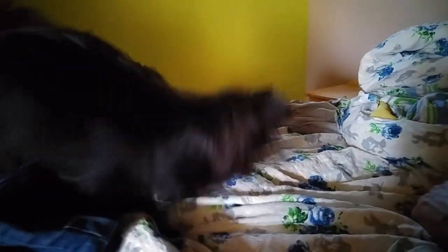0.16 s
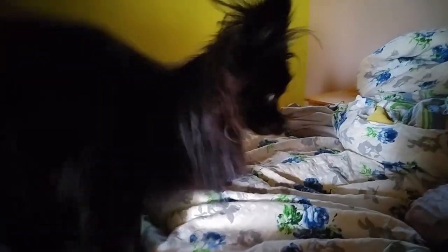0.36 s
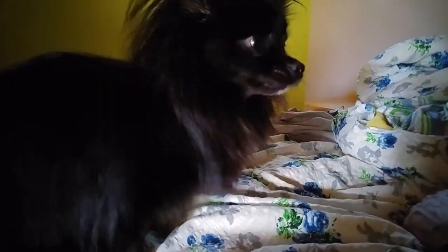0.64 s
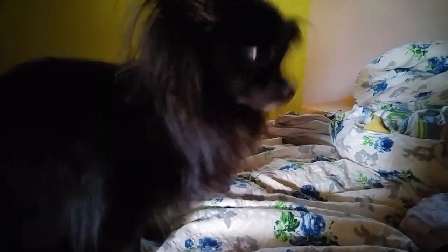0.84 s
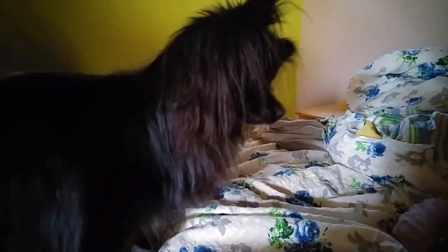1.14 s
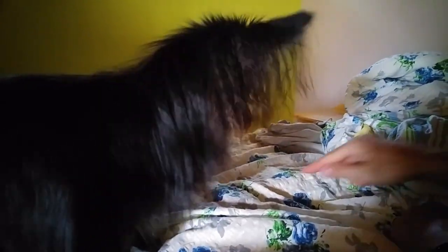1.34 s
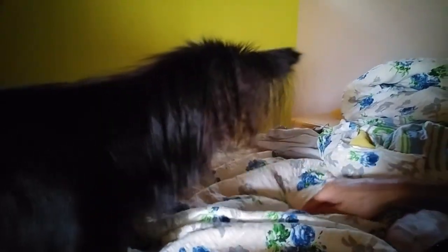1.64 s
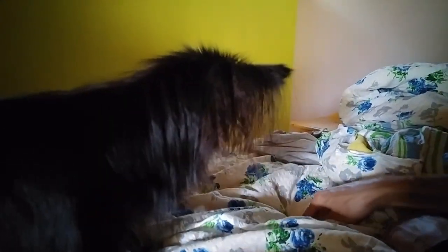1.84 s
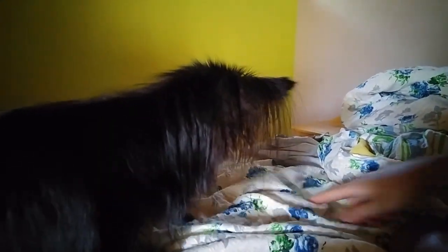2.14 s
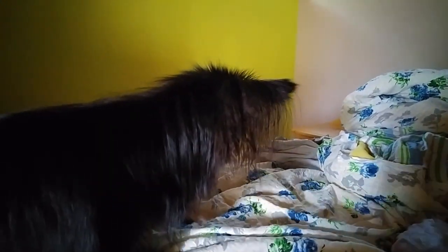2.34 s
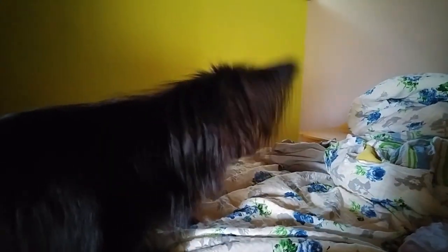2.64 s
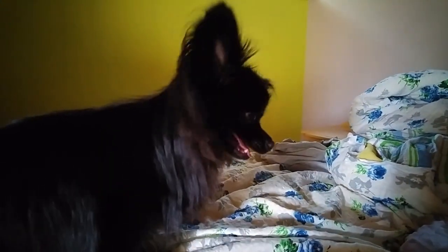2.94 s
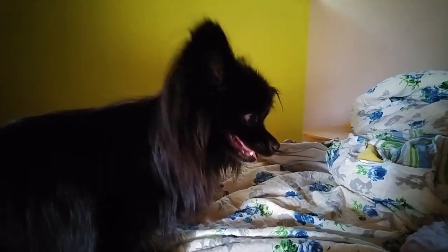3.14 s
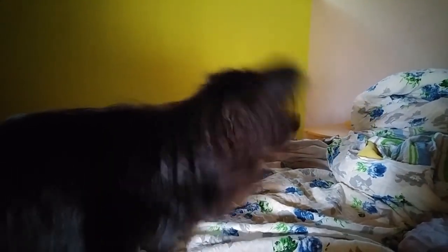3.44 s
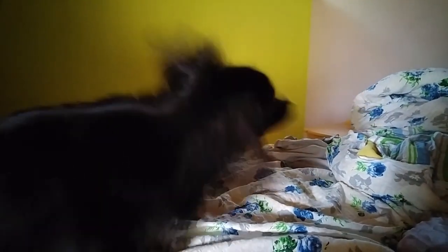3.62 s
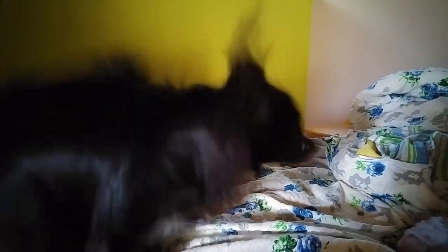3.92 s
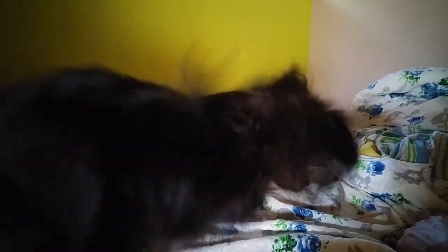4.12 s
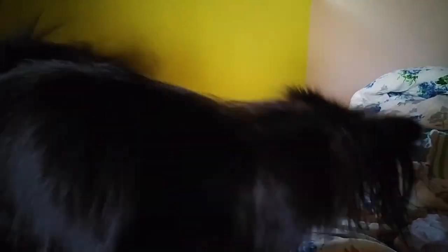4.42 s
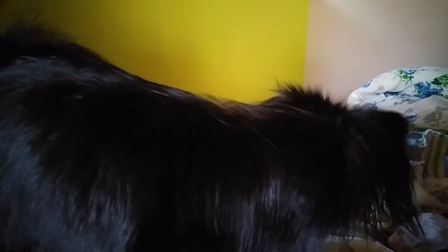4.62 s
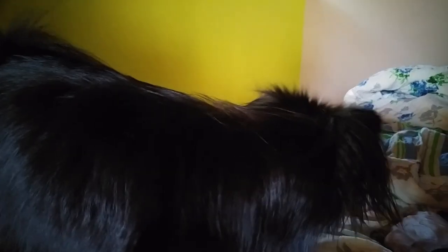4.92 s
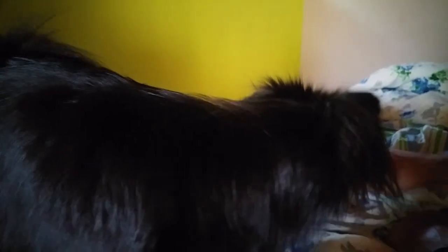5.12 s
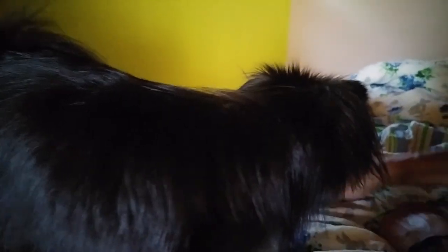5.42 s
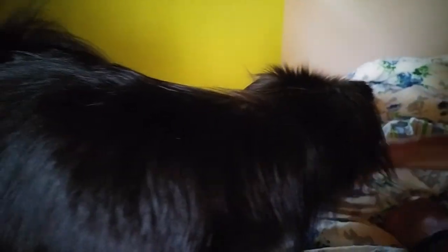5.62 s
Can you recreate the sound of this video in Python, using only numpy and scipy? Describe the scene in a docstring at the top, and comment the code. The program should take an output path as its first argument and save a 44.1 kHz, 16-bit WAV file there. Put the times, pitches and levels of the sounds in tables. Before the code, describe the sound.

A small dog whimpers and lets out a sharp yelp that breaks into a grunt, then whimpers again. After a pause comes one high, arching cry, a long thin nasal whine, and finally five short, rough yips. A duvet rustles and thumps softly under its paws. The dog is close to a stereo microphone in a small, quiet bedroom with a short ring.

```python
"""A small dog on a bed in a small bedroom, close to a stereo microphone and facing away from it.
It opens with a yelp that breaks into a grunt, between two whimpers. At 1.5 s comes one high arching cry,
then a long thin whine, and at 5.3 s a run of five short yips. The voice is a stack of harmonics from the
vocal folds, shaped by nose and mouth. The duvet rustles and thumps as the dog moves, and all along
the walls add a short ring over a faint hiss."""
import sys
import numpy as np
from scipy import signal
from scipy.fft import rfft, irfft
from scipy.io import wavfile
from scipy.ndimage import uniform_filter1d, minimum_filter1d

SR = 44100
rng = np.random.default_rng(int(sys.argv[2]) if len(sys.argv) > 2 else 0)


def generate_wav(sig):
    """Save sig (samples, or channels by samples) to the path in sys.argv[1] as 16-bit PCM at SR."""
    pcm = np.round(np.clip(np.atleast_2d(sig).T, -1, 1) * 32767).astype(np.int16)
    wavfile.write(sys.argv[1], SR, pcm)


N = 254456
TIME = np.arange(N) / SR
TOP_HZ = 15900

# resonances of the throat, whining through the nose: (frequency [Hz], level [dB])
NASAL_THROAT = [(1000, -5.5), (2200, -6.5), (3180, -20), (3370, -15.5), (3900, -9), (4450, -2.5),
                (5400, -11), (6500, -23.5), (7500, -31.5), (8900, -21.5), (10000, -22.5), (11100, -13.5),
                (12200, -29), (15200, -37.5)]
# low rumble and rustle of the duvet: (frequency [Hz], level [dB])
DUVET_SPECTRUM = [(15, -38.5), (25, -19.5), (64, 0.5), (140, -14.0), (399, -17), (525, -26), (634, -13.5),
                  (800, -14.5), (1040, -33.5), (1760, -120), (1500, -18.5), (3000, -49.5), (12000, -49.5)]


def undb(db):
    """Decibels to gain."""
    return 10 ** (np.asarray(db) / 20)


def curves(table):
    """Each column of a timed table, at every sample."""
    times, *columns = np.transpose(table)
    return [np.interp(TIME, times, column) for column in columns]


def at_frequency(points, hz):
    """Read a table on a log-frequency axis."""
    knots_hz, values = np.transpose(points)
    return np.interp(np.log(np.maximum(hz, 1)), np.log(np.maximum(knots_hz, 1)), values)


def noise(points):
    """Noise of rms 1 with the given spectrum."""
    gain = undb(at_frequency(points, np.fft.rfftfreq(N, 1 / SR)))
    x = irfft(rfft(rng.standard_normal(N)) * gain, N)
    return x / x.std()


def walk(rate_hz):
    """Smooth random motion of spread 1, up to about rate_hz."""
    x = irfft(rfft(rng.standard_normal(N)) / (1 + (np.fft.rfftfreq(N, 1 / SR) / rate_hz) ** 2), N)
    return x / x.std()


def coloured(x, points):
    """Shade a sound by a spectrum; the padding keeps its end from wrapping round."""
    gain = undb(at_frequency(points, np.fft.rfftfreq(2 * N, 1 / SR)))
    return irfft(rfft(x, 2 * N) * gain)[..., :N]


def envelope(start, length, attack_s, release_s):
    """Attack, hold and release."""
    return np.clip((TIME - start) / attack_s, 0, 1) * np.clip((start + length - TIME) / release_s, 0, 1)


def room_tone(side_db=-9):
    """Faint room noise and hiss, mostly alike on both sides."""
    # the quiet bedroom: (frequency [Hz], level [dB])
    spectrum = [(15, -54.5), (25, -23.5), (55, -0.5), (119, -3.5), (253, -3), (433, 0), (509, -19),
                (666, -3), (1050, -14), (1850, -19.5), (2170, -30.5), (2490, -22.5), (4380, -29.5),
                (6730, -16.5), (15500, -35)]
    # its slow fade: (time [s], level [dB])
    fade = [(0, -55.5), (.7, -61), (1.45, -64.5), (4.5, -66), (5, -72), (5.3, -73)]
    side = undb(side_db) * noise(spectrum) * np.array([[1], [-1]])
    return (noise(spectrum) + side) * undb(curves(fade)[0] + walk(20))


def bedroom_ring(x, wet_db=-8, low_t60=.13, high_t60=.25, split_hz=1300, delay_s=.0035):
    """A short diffuse ring from the walls; the bedding soaks up the lows sooner."""
    age = TIME[:SR // 2]
    echoes = rng.standard_normal((2, len(age)))
    low = signal.sosfilt(signal.butter(2, split_hz, fs=SR, output="sos"), echoes)
    high = signal.sosfilt(signal.butter(2, split_hz, "high", fs=SR, output="sos"), echoes)
    onset = np.clip(age / delay_s - 1, 0, 1)
    tail = (low * 1000 ** (-age / low_t60) - high * 1000 ** (-age / high_t60)) * onset
    tail /= np.sqrt((tail ** 2).sum(axis=1, keepdims=True))
    return undb(wet_db) * signal.fftconvolve(x[None], tail, axes=1)[:, :N]


def corner_echoes(x, echo_db=-17, drift_s=5e-5, sway_hz=3.4, count=4):
    """First echoes; their paths shift as the head sways, so each harmonic swells and dips alone."""
    highs = signal.sosfilt(signal.butter(1, 900, "high", fs=SR, output="sos"), x)
    oversampled = signal.resample_poly(highs, 2, 1)
    out = np.zeros((2, N))
    for side in out:
        for delay_s in rng.uniform(.001, .009, count):
            emitted_at = TIME - delay_s - drift_s * walk(sway_hz)
            side += np.interp(emitted_at, np.arange(2 * N) / (2 * SR), oversampled)
    return undb(echo_db) * out


def microphone_ports(x):
    """Close direct sound: the right port leads, each is shaded differently, the balance follows the head."""
    # shading between the ports: (frequency [Hz], left minus right [dB])
    balance = [(350, -3), (650, -6), (900, -2), (1150, -7), (1700, -6), (2300, -4), (3300, 2.5), (4400, 0),
               (8000, 4), (15000, -13)]
    # how far the left port trails: (frequency [Hz], phase [rad])
    lag = [(100, 0.09), (1000, 0.097), (2400, 0.61), (4600, 1.326), (8000, 2.1), (15000, 1.6)]
    # where the muzzle points: (time [s], left minus right [dB])
    head_turn = [(0, 1.5), (.5, 3.5), (1.55, 4), (1.86, 2.5), (2.6, 2), (2.96, 3.5), (3.1, 3), (4, 3),
                 (4.15, -1.5), (4.5, -0.5), (5.77, -1)]
    hz = np.fft.rfftfreq(2 * N, 1 / SR)
    lean = undb(at_frequency(balance, hz))
    left = lean * np.exp(-1j * at_frequency(lag, hz))
    pair = np.array([left, np.ones(len(hz))]) / np.sqrt((1 + lean ** 2) / 2)
    pan = undb(curves(head_turn)[0] * np.array([[.5], [-.5]]))
    return irfft(rfft(x, 2 * N) * pair)[:, :N] * pan


def rumble(calls, below_db=-51, rest_db=-80, smooth_s=.03):
    """A faint low rumble that never quite stops and swells with the loudness of the calls."""
    loudness = np.sqrt(np.maximum(uniform_filter1d(calls ** 2, int(smooth_s * SR)), 0))
    return noise(DUVET_SPECTRUM) * (undb(below_db) * loudness + undb(rest_db))


def duvet_rustle(flutter_db=3.5):
    """The duvet rumbles and rustles as the dog shifts its weight."""
    # shifts of weight: (time [s], length [s], level [dB])
    shifts = [(0.031, 0.23, -40), (.385, 0.2, -55), (0.488, 0.12, -50), (2.75, 0.13, -68),
              (3.204, 0.17, -64), (3.398, 0.22, -66), (3.709, 0.56, -49.5), (4.158, 0.31, -60),
              (4.635, 0.11, -58)]
    stirring = sum(undb(db) * envelope(start, length, attack_s=.0057, release_s=.21)
                   for start, length, db in shifts)
    return noise(DUVET_SPECTRUM) * stirring * undb(flutter_db * walk(25))


def paw_steps(attack_s=.0005, snap_s=.003, snap_db=3):
    """Each step is a brief snap, then a soft thump with a crinkle of cloth."""
    # paws and folds of cloth: (time [s], level [dB], time to fall 20 dB [s], crispness [dB])
    steps = [(0.05, -34, .03, -15.5), (1.234, -69, .07, 13.5), (1.27, -56.5, .018, 5),
             (3.721, -38.5, .034, -21), (3.769, -47, 0.032, -20), (3.827, -44, 0.01, -15),
             (3.888, -37, 0.0088, -17), (3.933, -42, .05, -38), (4.008, -40, 0.018, -11),
             (4.04, -43.5, .015, -18), (4.066, -42.5, 0.02, -12), (4.269, -47, 0.037, -14),
             (4.775, -67, .02, 10)]
    # a paw landing on the bed: (frequency [Hz], level [dB])
    thump_spectrum = [(40, -8.5), (100, 4), (400, -9), (800, -6.5), (1500, -15.5), (4000, -34.5),
                      (15000, -49.5)]
    # the cloth creasing: (frequency [Hz], level [dB])
    crinkle_spectrum = [(300, -16), (1500, -6), (3000, -8.5), (7000, 9), (13000, 2.5), (16000, -11.5)]
    thump = noise(thump_spectrum)
    crinkle = noise(crinkle_spectrum) * undb(1.6 * walk(200))
    out = np.zeros(N)
    for start, db, decay_s, crisp_db in steps:
        age = np.maximum(TIME - start, 0)
        snap = undb(snap_db) * np.exp(-age / snap_s)
        shape = np.minimum(age / attack_s, 1) * (10 ** (-age / decay_s) + snap)
        out += undb(db) * shape * (thump + undb(crisp_db) * crinkle)
    return out


def contour(table, edge_s=.005):
    """Pitch and gain of a call that follows a curve."""
    hz, db = curves(table)
    start, end = table[0][0], table[-1][0]
    return hz, undb(db) * envelope(start - edge_s / 2, end - start + edge_s, edge_s, edge_s)


def voice(hz, gain, throat, jitter, rasp_db, first_db, second_db, treble_db, firm_hz=1040, slack_db=0,
          rough_power=0, dulling_db_per_s=0, waver=.00097, shimmer_db=.12):
    """Vocal folds with a slow waver and a fast jitter, their harmonics sliding under the throat's peaks."""
    on = gain > 0
    hz, gain = hz[on], gain[on]
    age = np.arange(len(hz)) / SR
    roughness = (hz / firm_hz) ** rough_power
    unsteady_hz = hz * (1 + waver * walk(22)[on] + jitter * roughness * walk(310)[on])
    phase = 2 * np.pi * np.cumsum(unsteady_hz) / SR
    k = np.arange(1, int(TOP_HZ / hz.min()) + 1)[:, None]
    treble_share = np.clip((k * hz - 5800) / 1400, 0, 1) * (k > 2)
    db = at_frequency(throat, k * hz) + (treble_db - dulling_db_per_s * age) * treble_share
    # below their firm pitch the folds slacken and the tone grows rounder, by slack_db an octave
    db += slack_db * np.maximum(np.log2(firm_hz / hz), 0) / k ** 1.9
    # each call sets the strength of its two lowest harmonics, sounding fuller or thinner
    size = undb(db + first_db * (k == 1) + second_db * (k == 2)) * (k * hz < TOP_HZ)
    # the resonances delay each harmonic differently, which spreads the pulse over its cycle
    spread = np.pi * k ** 2 / 5
    tone = (size * np.sin(k * phase + spread)).sum(axis=0) / np.sqrt((size ** 2).sum(axis=0) / 2)
    # air escapes once a cycle, while the folds are open, and passes through the same throat
    rasp = undb(rasp_db) * roughness * noise(throat)[on] * (1 + np.cos(phase))
    out = np.zeros(N)
    out[on] = (tone + rasp) * gain * undb(shimmer_db * walk(110)[on])
    return out


def whimpers(sag_power=2.7, fade_db=-7):
    """Two clean nasal whimpers: each holds its note, then droops and fades together."""
    # whimpers: (time [s], length [s], first pitch [Hz], last pitch [Hz], level [dB])
    notes = [(-.012, .08, 1060, 1020, -27), (0.461, 0.094, 1099, 929, -29.5)]
    hz, gain = np.zeros((2, N))
    for start, length, first_hz, last_hz, db in notes:
        sag = np.clip((TIME - start) / length, 0, 1) ** sag_power
        shape = envelope(start, length, attack_s=.0083, release_s=.0071)
        hz = np.where(shape > 0, first_hz + (last_hz - first_hz) * sag, hz)
        gain += shape * undb(db + fade_db * sag)
    return voice(hz, gain, NASAL_THROAT, jitter=.0002, rasp_db=-52.5,
                 first_db=-1.6, second_db=-1.3, treble_db=1, waver=.002)


def whine():
    """A long thin note through the nose that frays when pushed high and dulls as it goes on."""
    # two pushes, each followed by a sag: (time [s], pitch [Hz], level [dB])
    pushes = [(2.128, 1120, -26), (2.199, 1323, -20), (2.25, 1232, -20.5), (2.36, 1169, -19.5),
              (2.66, 1116, -19.5), (3.0, 1108, -20.5), (3.27, 1087, -23.5), (3.55, 1071, -24),
              (3.69, 1092, -23.5), (3.729, 1171, -17), (3.8, 1125, -20.5), (3.91, 1089, -24),
              (4.03, 1072, -25), (4.16, 1061, -30), (4.35, 1030, -32), (4.44, 950, -39), (4.495, 857, -55)]
    return voice(*contour(pushes), NASAL_THROAT, jitter=.00008, rasp_db=-70, first_db=-4, second_db=-7,
                 treble_db=-.5, firm_hz=1030, slack_db=89, rough_power=7.9, dulling_db_per_s=1.5,
                 waver=.0012)


def yelp():
    """A wide-mouthed yelp that frays at the bottom of its pitch and breaks into a grunt."""
    # the yelp's leap and fall: (time [s], pitch [Hz], level [dB])
    leap = [(.061, 539, -28), (.072, 640, -16.5), (.085, 721, -10.5), (.099, 824, -9), (.124, 1045, -9),
            (.139, 1098, -7.5), (.151, 1026, -15), (.162, 810, -9.5), (.178, 681, -13), (.192, 680, -24)]
    # the sinking grunt: (time [s], pitch [Hz], level [dB])
    drop = [(.176, 478.7, -18), (.184, 367.5, -13.5), (.2, 310, -20), (.22, 260.6, -29)]
    # resonances of the wide mouth: (frequency [Hz], level [dB])
    mouth = [(300, -7.5), (700, -10), (1600, 1.5), (2300, -15), (3300, -28), (4300, -13), (5500, -13),
             (6500, -18.5), (7400, -14.5), (8700, -24), (9800, -39.5), (11500, -33.5), (15000, -54.5)]
    call = voice(*contour(leap), mouth, jitter=.0014, rasp_db=-38, first_db=-11.5, second_db=-2,
                 treble_db=-3.5, firm_hz=1080, slack_db=28.5, rough_power=-2.5)
    grunt = voice(*contour(drop), mouth, jitter=.013, rasp_db=-25, first_db=23, second_db=20, treble_db=3.5)
    return call + grunt


def cry():
    """One high, strained cry that climbs and falls in steps, resting twice on the same note."""
    # the cry's arch: (time [s], pitch [Hz], level [dB])
    arch = [(1.532, 1184, -12.5), (1.585, 1460, -10), (1.62, 1791, -10), (1.67, 1810, -11.5),
            (1.753, 2109, -11), (1.767, 2393, -8), (1.805, 2542, -12), (1.862, 2548, -12),
            (1.888, 2422, -10.5), (1.932, 1814, -18), (2.003, 1749, -17.5), (2.016, 1584, -22),
            (2.048, 1400, -22.5), (2.082, 891, -34.5)]
    # resonances of the crying mouth: (frequency [Hz], level [dB])
    mouth = [(150, -57.5), (700, -21.5), (1200, -14.0), (2400, -12.5), (3100, -19.0), (3600, -12.5),
             (4300, -5.0), (5000, 0.0), (5700, -6.5), (6500, -6.5), (7500, -8.0), (9000, -13.5),
             (11200, -19.5), (13000, -26.5), (15500, -48.0)]
    return voice(*contour(arch), mouth, jitter=.005, rasp_db=-28, first_db=-.35, second_db=-.5,
                 treble_db=-1.5, firm_hz=1500, slack_db=16, rough_power=-.89, waver=.0054, shimmer_db=1)


def yips(top_share=.44, half_width_share=.28):
    """Rough, strained yips: each starts abruptly and makes one bell-shaped arch in pitch."""
    # yips: (time [s], length [s], resting pitch [Hz], top pitch [Hz], level [dB])
    notes = [(5.316, .091, 1193, 1410, -12), (5.456, .094, 1116, 1950, -12.5),
             (5.601, .084, 1133, 1500, -13), (5.703, .046, 1107, 1180, -21),
             (5.756, 0.0808, 1140, 1500, -11.5)]
    # resonances of the tight mouth: (frequency [Hz], level [dB])
    mouth = [(150, -62), (700, -20), (1200, -10), (2500, -13.5), (3150, -16), (3700, -10), (4300, -1.5),
             (4900, 7), (5600, -0.5), (6500, 0), (7500, 3.5), (9000, -1.5), (11200, -1.5), (15500, -29)]
    hz, gain = np.zeros((2, N))
    for start, length, rest_hz, top_hz, db in notes:
        progress = (TIME - start) / length
        arch = np.exp(-((progress - top_share) / half_width_share) ** 2)
        shape = envelope(start, length, attack_s=.0031, release_s=.0177)
        hz = np.where(shape > 0, rest_hz + (top_hz - rest_hz) * arch, hz)
        gain += shape * undb(db)
    return voice(hz, gain, mouth, jitter=.0095, rasp_db=-18, first_db=4, second_db=3,
                 treble_db=-7.5, waver=.009, shimmer_db=1.5)


def scene(dog_db=-1.75):
    """The dog faces away from the microphone, so its treble is beamed at the walls and rings back."""
    # what the head lets past toward the microphone: (frequency [Hz], gain [dB])
    head_shadow = [(5400, 0), (6600, -6), (9000, -7), (11200, -4), (13000, -7)]
    # what it sends to the walls: (frequency [Hz], gain [dB])
    beam = [(150, -11), (400, 9.5), (1100, 1.5), (2200, 2), (3100, 8), (4300, 2), (5500, 2.5), (7000, 5.5),
            (11000, -3.5), (14000, 2)]
    calls = undb(dog_db) * (whimpers() + whine() + yelp() + cry() + yips())
    on_bed = calls + rumble(calls) + duvet_rustle() + paw_steps()
    direct = coloured(on_bed, head_shadow)
    to_walls = coloured(on_bed, beam)
    return microphone_ports(direct) + corner_echoes(direct) + bedroom_ring(to_walls) + room_tone()


def record(dry, ripple_db=-25, ripple_hz=3900, ceiling=.95):
    """A fast timing ripple gives high harmonics faint side tones; a limiter holds peaks; the top is cut."""
    timing_ripple = undb(ripple_db) * np.sin(2 * np.pi * ripple_hz * TIME)
    rippled = dry + timing_ripple * np.diff(dry, prepend=0)
    headroom = ceiling / np.maximum(np.abs(rippled).max(axis=0), ceiling)
    gain = uniform_filter1d(minimum_filter1d(headroom, size=440), size=440)  # 10 ms windows
    return signal.sosfilt(signal.ellip(8, .2, 70, TOP_HZ, fs=SR, output="sos"), rippled * gain)


dry = scene()
out = record(dry)
generate_wav(out)
```